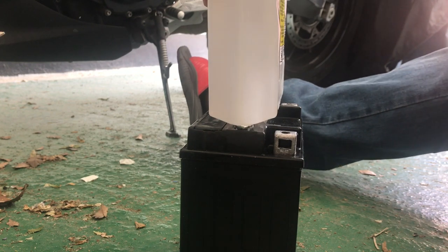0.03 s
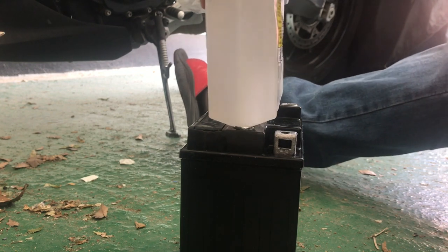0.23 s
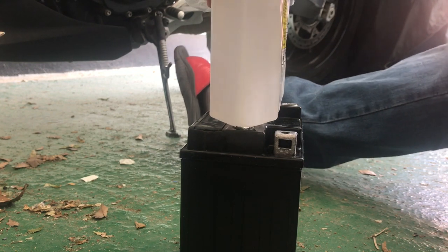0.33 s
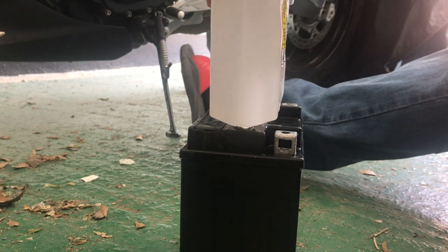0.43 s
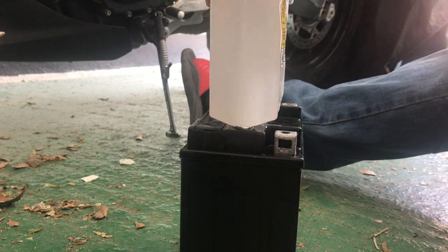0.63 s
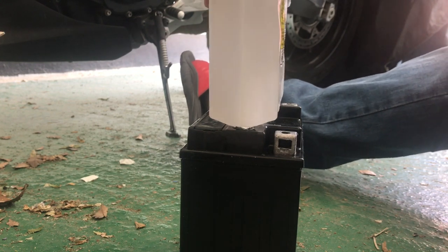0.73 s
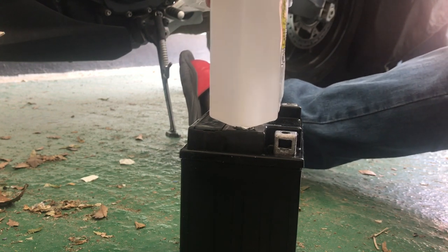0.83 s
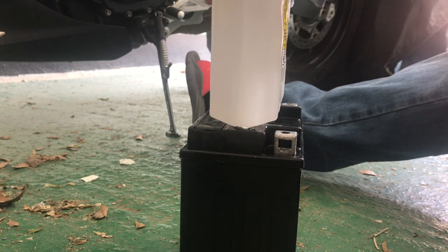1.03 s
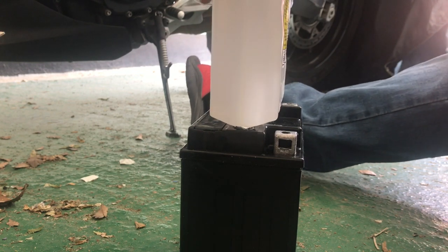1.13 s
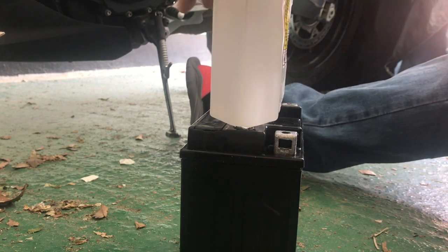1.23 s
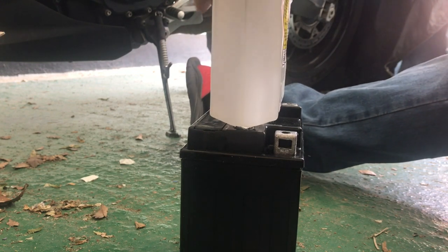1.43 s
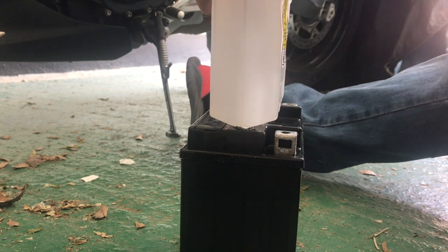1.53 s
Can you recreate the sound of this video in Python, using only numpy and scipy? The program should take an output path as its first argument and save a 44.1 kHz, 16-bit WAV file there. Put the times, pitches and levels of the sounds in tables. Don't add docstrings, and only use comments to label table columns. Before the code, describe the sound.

Two foil seals burst with sharp pops as a plastic liquid pack is pressed onto a battery

```python
import sys
import numpy as np
from scipy import signal
from scipy.fft import rfft, irfft
from scipy.io import wavfile
from scipy.ndimage import uniform_filter1d

SR = 44100
rng = np.random.default_rng(int(sys.argv[2]) if len(sys.argv) > 2 else 0)


def waveform_to_disk(signal):
    frames = np.transpose(np.atleast_2d(signal))
    scaled = np.clip(frames, -1, 1) * 32767
    samples = np.round(scaled).astype(np.int16)
    wavfile.write(sys.argv[1], SR, samples)


def amplitude_ratio(level_db):
    exponent = np.asarray(level_db, float) / 20
    return 10 ** exponent


N = 70560

# f/Hz, level/dB
RUMBLE_COLOUR = [(12, -57), (28, -17.5), (65, -5), (130, -8), (230, -14.5), (340, -21), (480, -28.5),
                 (800, -32), (1200, -33.5)]
# t/s, level/dB
TRAFFIC_SWELL = [(0, -0.5), (.09, -1.5), (.18, -1), (.3, 0.5), (.4, 2), (.5, 0), (.6, 1), (.72, -3),
                 (.8, 1), (.9, -1.5), (1.0, 0.5), (1.1, 0), (1.25, -0.5), (1.39, 0), (1.5, -0.5),
                 (1.6, 0.5)]
# f/Hz, level/dB
HISS_COLOUR = [(1200, -10.5), (1600, -12), (2300, -19), (3500, -18), (6000, -25.5), (10000, -31),
               (16000, -36)]
# t/s, f/Hz, level/dB
ENGINE_DRIFT = [(0, 75.1, -47), (.17, 62.5, -34), (.4, 66, -42.5), (.7, 66.5, -36.5), (0.801, 59.7, -41),
                (0.899, 88.3, -38.5), (1.0, 91.8, -41), (1.12, 115.6, -39), (1.25, 114.6, -46),
                (1.32, 69.2, -49), (1.42, 96.3, -38.5), (1.5, 63.8, -51), (1.6, 58, -31)]
# f/Hz, fade time/s
ECHO_FADE = [(150, 0.39), (600, 0.04), (1500, 0.38), (4000, 0.34), (8000, 0.26), (15000, 0.2)]
# t/s, level/dB
CASE_LOAD = [(0, -46), (.1, -48), (.3, -48), (.45, -51), (.62, -50), (.72, -46), (.8, -65), (.88, -44.5),
             (.97, -40), (1.05, -41), (1.15, -37.5), (1.25, -40.5), (1.319, -34), (1.38, -50),
             (1.43, -38.5), (1.53, -49), (1.6, -40)]
# t/s, level/dB
SLIDE_LEVEL = [(1.0, -83), (1.08, -62), (1.2, -67), (1.37, -62), (1.42, -49), (1.6, -56)]
# t/s, level/dB
HAND_PRESSURE = [(0, -36.5), (0.066, -53.5), (.085, -78), (.5, -57.5), (0.533, -44), (0.622, -43.5),
                 (.64, -93), (0.999, -65), (1.052, -48.5), (1.171, -47.5), (1.2, -41), (1.349, -42.5),
                 (1.37, -52), (1.45, -47), (1.561, -43), (1.6, -74)]
# f/Hz, level/dB
CREAK_COLOUR = [(500, -33), (1000, -2), (2000, -2), (3500, -2), (6500, -6), (10000, -8), (16000, -16)]
# t/s, level/dB, pitch f/Hz,
# length/s
PLASTIC_SNAPS = [(.0001, -40, 4300, 0.0018), (.0046, -21, 6560, 0.0043), (.0072, -22, 1530, 0.0048),
                 (.0502, -26.5, 6750, 0.0023), (0.335, -13.5, 4560, 0.002), (0.3464, -26, 4480, 0.0028),
                 (0.485, -30.5, 2020, .002), (0.528, -27.5, 2999, 0.0013), (0.532, -40, 6100, 0.0021),
                 (0.5517, -20, 3200, 0.0021), (0.5544, -20.5, 5830, 0.0032), (0.571, -33, 7700, 0.0039),
                 (0.581, -25, 6240, 0.0055), (.594, -29, 3230, 0.0028), (.598, -31, 4000, 0.0035),
                 (.605, -24, 3270, 0.0024), (.618, -30.5, 4030, 0.0038), (0.8915, -20, 4200, 0.004),
                 (1.021, -26.5, 4140, 0.0037), (1.0218, -30, 2600, 0.0034), (1.0463, -23, 2370, 0.0022),
                 (1.05, -27.5, 1950, 0.0033), (1.074, -22, 2970, 0.0009), (1.0748, -33.5, 13000, 0.0015),
                 (1.089, -31, 4500, 0.0026), (1.099, -30, 2980, .002), (1.108, -28, 5900, 0.0027),
                 (1.113, -20.5, 5460, 0.003), (1.124, -22.5, 2480, 0.0037), (1.13, -23, 6400, 0.0026),
                 (1.1572, -27, 3450, 0.0018), (1.1607, -20, 6540, 0.0015), (1.165, -28, 10200, 0.0017),
                 (1.189, -19.5, 6270, 0.0034),
                 (1.2, -23.5, 6040, 0.003), (1.2029, -18, 8200, 0.0021), (1.215, -30, 8100, 0.0015),
                 (1.206, -18.5, 2830, 0.005), (1.2238, -10.5, 6800, 0.0015), (1.2247, -10, 4330, 0.0018),
                 (1.2275, -20, 6800, 0.0036), (1.241, -27, 6430, 0.0017), (1.2498, -24, 9100, 0.0029),
                 (1.2531, -19.5, 4900, 0.0019), (1.2556, -18, 6700, 0.0025), (1.261, -14, 3200, 0.0015),
                 (1.2645, -16, 9000, 0.003), (1.267, -12, 2100, 0.0018), (1.2792, -20.5, 8500, 0.0024),
                 (1.281, -24, 4000, 0.0023), (1.283, -23, 3200, 0.002), (1.2908, -21, 9500, 0.0024),
                 (1.2915, -27, 4000, 0.0016), (1.3125, -20, 3440, 0.0028), (1.315, -20, 11100, .0012),
                 (1.3155, -20.5, 1400, 0.0021), (1.322, -28, 10900, 0.0012), (1.328, -16, 6660, .0012),
                 (1.3305, -21, 6800, 0.0025), (1.331, -20, 3440, .003), (1.3336, -25, 3420, 0.0041),
                 (1.3362, -15, 6750, 0.0032), (1.341, -20, 10100, 0.0022), (1.3426, -20.5, 6940, 0.0025),
                 (1.344, -21, 4020, 0.0023), (1.348, -21, 4100, 0.0015), (1.3877, -22, 3040, 0.0034),
                 (1.388, -20, 5100, 0.0039), (1.412, -24, 1850, 0.003), (1.424, -23.5, 5600, 0.0031),
                 (1.436, -29, 5030, 0.0022), (1.492, -25, 4200, 0.0031), (1.5006, -18.5, 5420, 0.0027),
                 (1.555, -25.5, 3950, 0.0014), (1.571, -25, 2500, 0.0025), (1.586, -32, 8700, 0.0022)]
# f/Hz, level/dB
PLASTIC_COLOUR = [(290, -71), (500, -47), (807, -2), (1180, 3), (2190, -6.5), (3250, -2.5), (5970, -6.5),
                  (6700, -4.5), (16000, -7.5)]
DROPS = [
    .2188,
    .7795,
]
# f/Hz, level/dB, time to fade by 60 dB/s, head start/s
CHAMBER_TONES = [
    [(143, -16, 0.15, 0.00012), (210, -8.5, 0.06, 0.0047), (251, -8.5, 0.06, 0.00412),
     (454, -24.5, 0.056, 0.0018), (870, -19.5, 0.039, 0.00325), (1310, -7.5, 0.016, 0.00291),
     (1455, -7.5, 0.028, 0.002), (2470, -16.5, 0.02, 0.0065), (1694, -12.5, 0.039, 0.00206),
     (1970, -12.5, 0.038, 0.000995), (3420, -15, 0.043, 0.0077), (4150, -11, 0.033, 0.003)],
    [(143.1, -24, 0.15, 0.00012), (255.4, -22, 0.11, 0.00084), (311, -16.5, 0.04, 0.0035),
     (396, -15.5, 0.024, 0.0028), (463, -28, 0.029, 0.0021), (843, -19.5, 0.023, 0.00393),
     (982, -26.5, 0.06, 0.0013), (1377, -24.5, .15, 0.00211), (1710, -27, 0.053, 0.00193),
     (1820, -32, 0.039, 0.00205), (3200, -4, 0.0093, .007), (1472, -17.5, 0.039, 0.00609),
     (2620, -7.5, 0.014, 0.0057), (4200, -1.5, 0.011, .0035), (4650, -6, 0.011, .003)],
]
# stretch starts t/s, rip starts t/s, gives way t/s, rip level/dB, stretch level/dB
FOIL_SEALS = [
    (0.198, 0.2105, 0.22, -12, -24),
    (0.765, 0.7715, 0.778, -10, -30),
]
# f/Hz, level/dB
FOIL_COLOUR = [(300, -28.5), (1050, -15.5), (1300, -3.5), (2300, -10), (4500, -6), (8000, -9), (11000, -14),
               (16000, -21.5)]


def evened(x):
    return x / np.sqrt(np.mean(x ** 2) + 1e-20)


def read(points, hz):
    f, value = np.transpose(points)
    return np.interp(np.log(hz + 1), np.log(f + 1), value)


def over_time(points, before=None):
    return np.interp(np.arange(N) / SR, *np.transpose(points), left=before)


def wander(width):
    once = uniform_filter1d(rng.standard_normal(N), size=width)
    return evened(uniform_filter1d(once, size=width))


def add(mix, s, sound):
    part = mix[round(s * SR):][:len(sound)]
    part += sound[:len(part)]


def colour(x, points):
    level_db = read(points, abs(np.fft.fftfreq(4096, 1 / SR)))
    log_gain = np.log(amplitude_ratio(np.maximum(level_db, -100)))
    taps = np.fft.ifft(np.exp(np.conj(signal.hilbert(log_gain)))).real[:2048]
    return signal.oaconvolve(x, taps / np.linalg.norm(taps))[:len(x)]


def clicks(size, per_s, spread_db):
    u = rng.random((size, 3))
    happens = u[:, 0] < per_s / SR
    sign = np.sign(u[:, 1] - 0.5)
    strength = amplitude_ratio(spread_db * np.minimum(-np.log(u[:, 2] + 1e-9), 4))
    return evened(happens * sign * strength)


def background():
    rumble_db, lumps_db, hiss_db = -34.5, 1, -54.5
    hz = np.fft.rfftfreq(N, 1 / SR)
    a, b = rng.standard_normal((2, N))
    low = evened(irfft(rfft(a) * amplitude_ratio(read(RUMBLE_COLOUR, hz)) * (hz < 1200), N))
    rumble = low * amplitude_ratio(rumble_db + lumps_db * wander(1500) + over_time(TRAFFIC_SWELL))
    hiss = evened(irfft(rfft(b) * amplitude_ratio(read(HISS_COLOUR, hz)) * (hz > 1200), N))
    return rumble + amplitude_ratio(hiss_db) * hiss


def drone():
    width_hz, fuzz_share = 15, 0.57
    s, hz, db = np.transpose(ENGINE_DRIFT)
    t = np.arange(N) / SR
    a, b = rng.standard_normal((2, N))
    fuzz = signal.sosfilt(signal.butter(2, width_hz / 2, fs=SR, output="sos"), a + 1j * b)
    turn = np.exp(2j * np.pi * np.cumsum(np.interp(t, s, hz)) / SR)
    hum = ((1 + fuzz_share * fuzz / np.std(fuzz)) * turn).real
    return amplitude_ratio(np.interp(t, s, db)) * evened(hum)


def garage(x):
    early_db, early_fade_s = -11, 0.067
    tail_db, scatter_db = -12, 2
    taps = np.zeros(4000)
    at = np.arange(60, len(taps) - 20, 16)
    taps[at + rng.integers(0, 16, len(at))] = rng.choice([-1., 1.], len(at))
    bounces = taps * amplitude_ratio(-60 * np.arange(len(taps)) / SR / early_fade_s)
    early = signal.fftconvolve(x, bounces / np.linalg.norm(bounces))[:N]

    hz, t, z = signal.stft(x, SR, nperseg=256, noverlap=192)
    keep = amplitude_ratio(-120 * t[1] / read(ECHO_FADE, hz))
    power = uniform_filter1d(abs(z) ** 2, size=7, axis=0)
    power = np.array([signal.lfilter([0, 0, 0, 1 - k], [1, -k], p) for k, p in zip(keep, power)])
    a, b = rng.standard_normal((len(t), len(hz), 2)).T
    diffuse = np.sqrt(abs(2 * power)) * (a + 1j * b)
    tail = signal.istft(diffuse, SR, nperseg=256, noverlap=192)[1][:N]
    return amplitude_ratio(early_db) * early + amplitude_ratio(tail_db + scatter_db * wander(80)) * tail


def groan():
    band = signal.butter(3, [90, 290], "band", fs=SR, output="sos")
    dull = signal.sosfilt(band, rng.standard_normal(N))
    return amplitude_ratio(over_time(CASE_LOAD)) * evened(dull)


def squeak():
    hz, width_hz, patchy_db = 4200, 268, 2
    fuzz = evened(signal.lfilter(*signal.iirpeak(hz, hz / width_hz, SR), rng.standard_normal(N)))
    return amplitude_ratio(over_time(SLIDE_LEVEL, before=-120) + patchy_db * wander(600)) * fuzz


def creak():
    per_s, spread_db, flicker_db = 12000, 1.5, 3
    level = amplitude_ratio(over_time(HAND_PRESSURE) + flicker_db * wander(100))
    return colour(level * clicks(N, per_s, spread_db), CREAK_COLOUR)


def snaps():
    per_s, spread_db, rise_s = 22000, 2.5, 0.00031
    snap_db, peak_db, peak_q, band_q = -4.5, 3, 6.5, 0.4
    floor, roof = 0.43, 2.06
    out = np.zeros(N)
    t = np.arange(1500) / SR
    for s, db, hz, length in PLASTIC_SNAPS:
        shape = np.minimum(t / rise_s, 1) * np.exp(-(t / max(length, 3e-4)) ** 2)
        spray = clicks(len(t), per_s, spread_db) * shape
        spray = spray * np.sqrt(length * SR / 2 / np.sum(spray ** 2))
        spray = signal.lfilter(*signal.butter(2, min(floor * hz, 4000), "high", fs=SR), spray)
        spray = signal.lfilter(*signal.butter(1, min(roof * hz, 18000), fs=SR), spray)
        band = signal.lfilter(*signal.iirpeak(hz, max(band_q, hz / 15000), SR), spray)
        peak = signal.lfilter(*signal.iirpeak(hz, peak_q, SR), spray)
        add(out, s, amplitude_ratio(db + snap_db) * (band + amplitude_ratio(peak_db) * peak))
    return colour(out, PLASTIC_COLOUR)


def ring(hz, fade_s, rise_s):
    t = np.arange(9000) / SR
    return np.minimum(t / rise_s, 1) * amplitude_ratio(-60 * t / fade_s) * np.sin(2 * np.pi * hz * t)


def blows():
    out = np.zeros(N)
    for s, tones in zip(DROPS, CHAMBER_TONES):
        for hz, db, fade_s, lead in tones:
            add(out, s - lead, -amplitude_ratio(db) * ring(hz, fade_s, max(1.36 / hz, 0.001)))
    return out


def seals():
    rip_per_s, rip_spread_db = 23000, 3
    rip_rise_s, rip_start_db, rip_fall_s = 0.0037, -18, 0.001
    vent_db, vent_s = -11, 0.022
    stretch_rise_s = 0.0048
    t = np.arange(N) / SR
    level = np.zeros(N)
    for stretch, rip, free, rip_db, stretch_db in FOIL_SEALS:
        after = np.maximum(t - free, 0)
        grow = np.clip((t - rip) / rip_rise_s, 0, 1) ** 0.5
        tear = (t > rip) * amplitude_ratio(rip_db + rip_start_db * (1 - grow))
        fall = np.exp(-after / rip_fall_s) + amplitude_ratio(vent_db) * np.exp(-after / vent_s)
        strain = amplitude_ratio(stretch_db) * np.clip((t - stretch) / stretch_rise_s, 0, 1) * (t < free)
        level += tear * fall + strain
    return colour(level * clicks(N, rip_per_s, rip_spread_db), FOIL_COLOUR)


def scene():
    far = background() + drone() + groan()
    near = squeak() + creak() + snaps() + blows() + seals()
    return (far + garage(near) + near)[None]


def band_limit(x):
    return signal.sosfilt(signal.butter(12, 16210, fs=SR, output="sos"), x)


def record(dry):
    clip, edge_hz = 1.25, 16000
    squeezed = clip * np.tanh(dry / clip)
    finished = signal.oaconvolve(squeezed, signal.firwin(255, edge_hz, fs=SR)[None], "same")
    return band_limit(finished)


dry = scene()
out = record(dry)
waveform_to_disk(out)
```